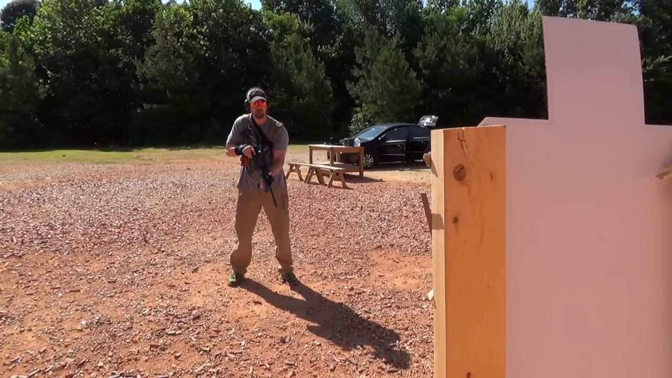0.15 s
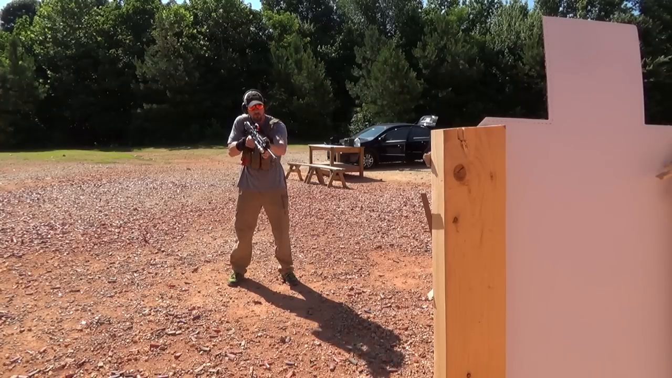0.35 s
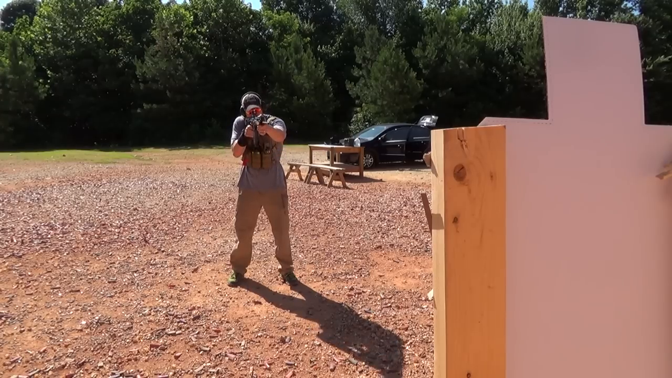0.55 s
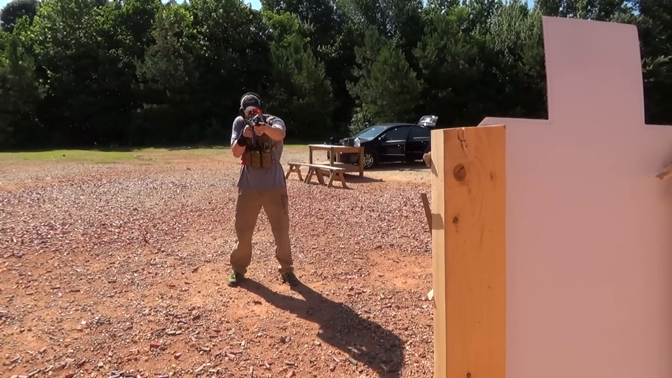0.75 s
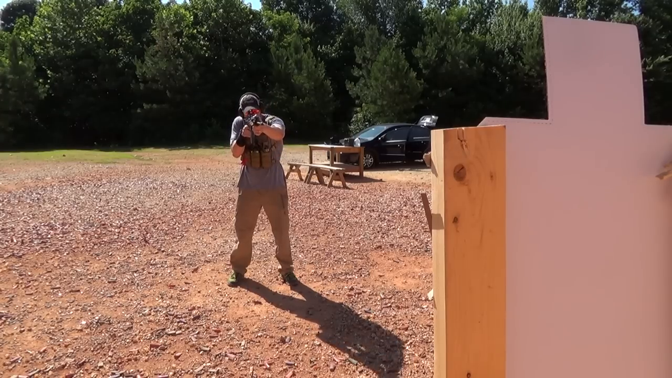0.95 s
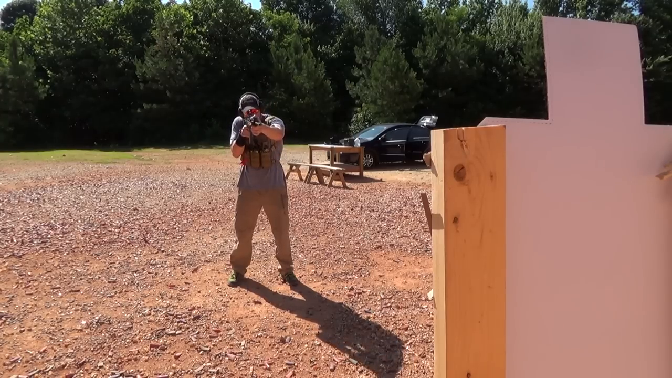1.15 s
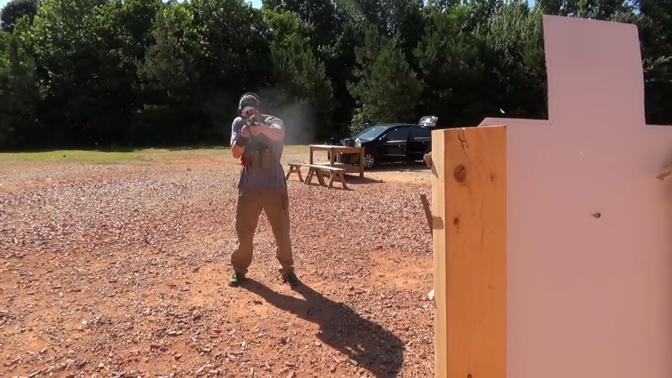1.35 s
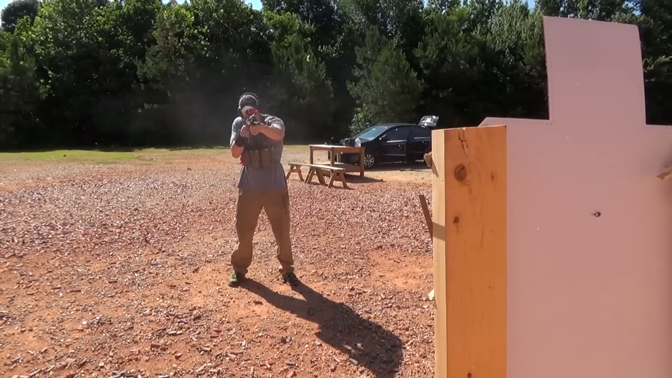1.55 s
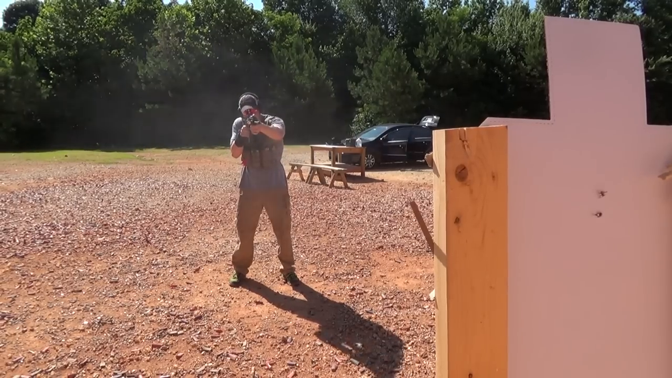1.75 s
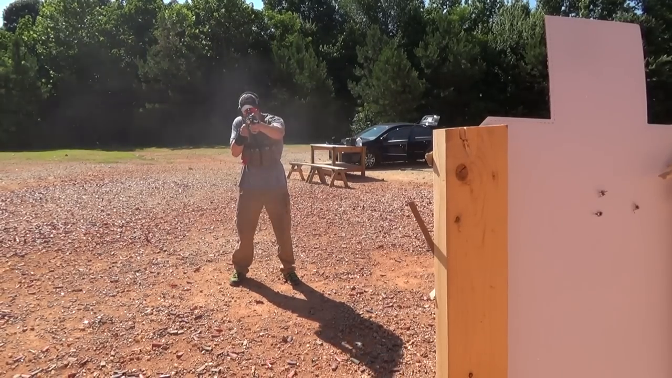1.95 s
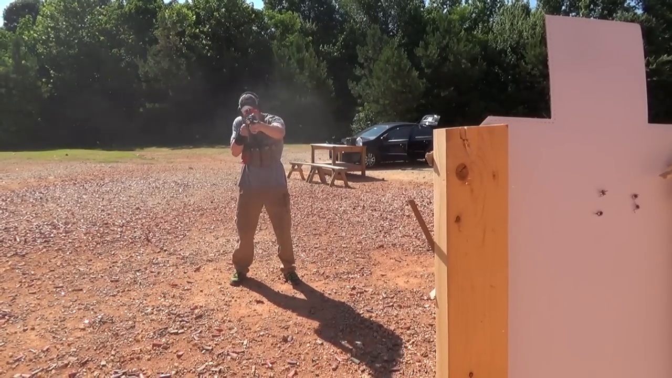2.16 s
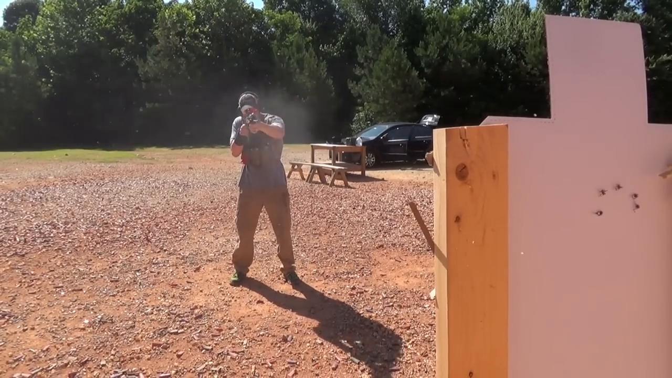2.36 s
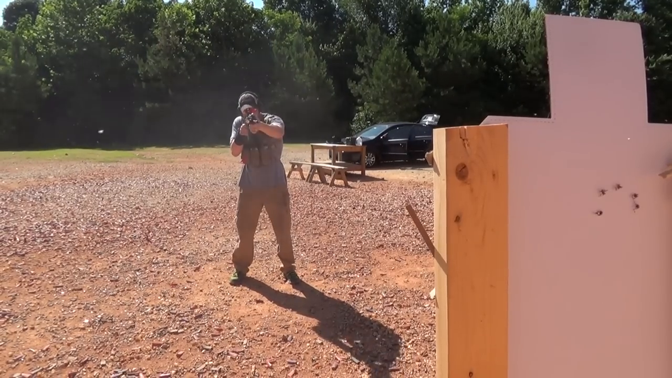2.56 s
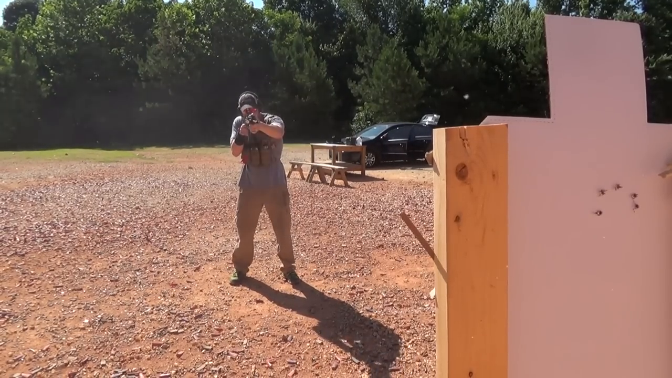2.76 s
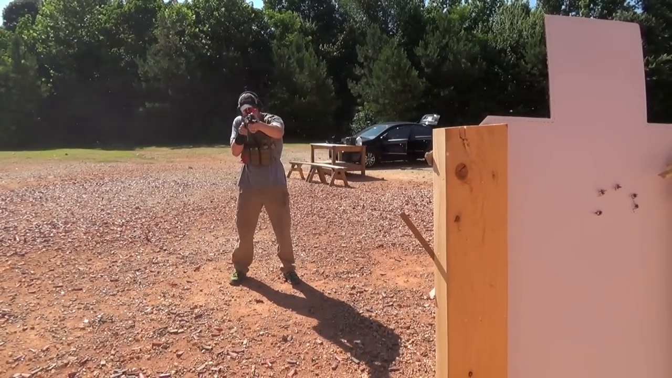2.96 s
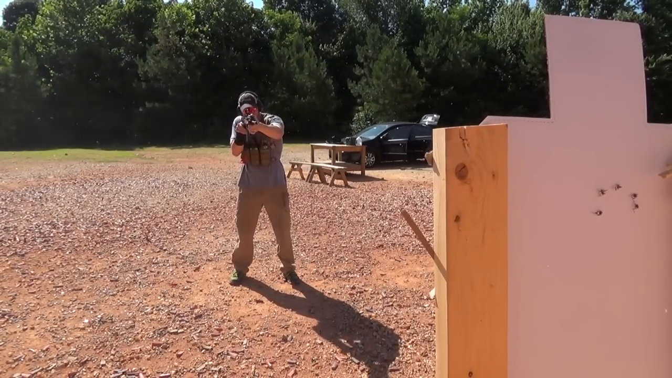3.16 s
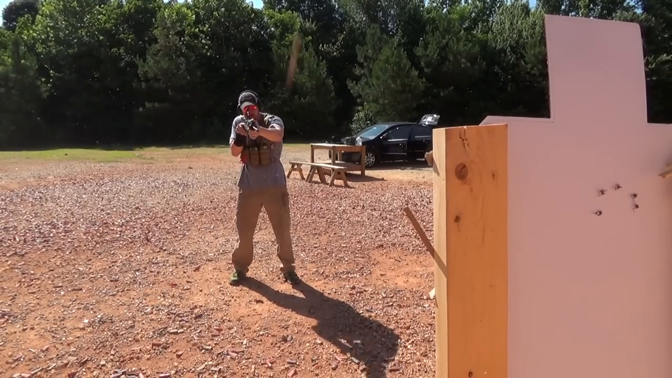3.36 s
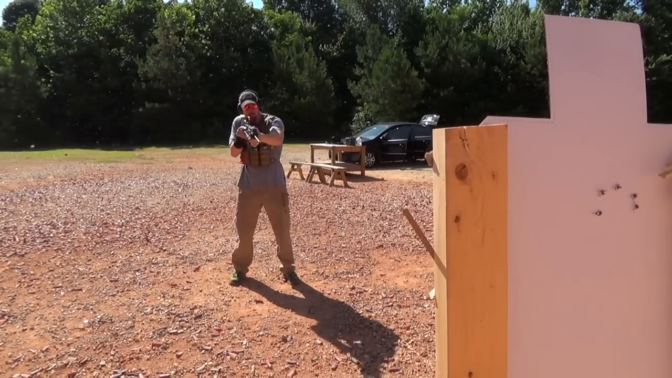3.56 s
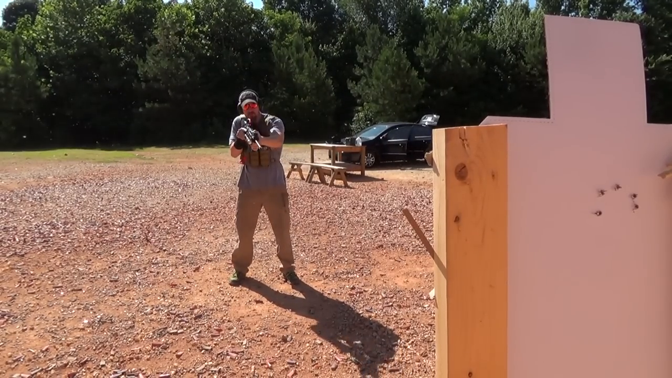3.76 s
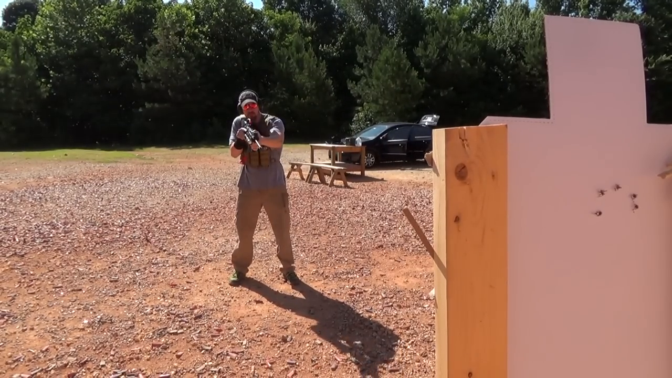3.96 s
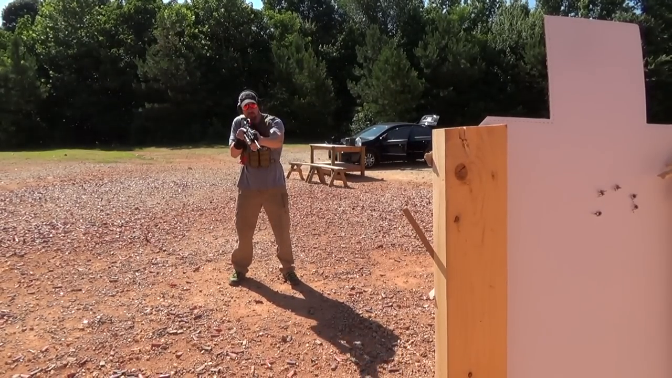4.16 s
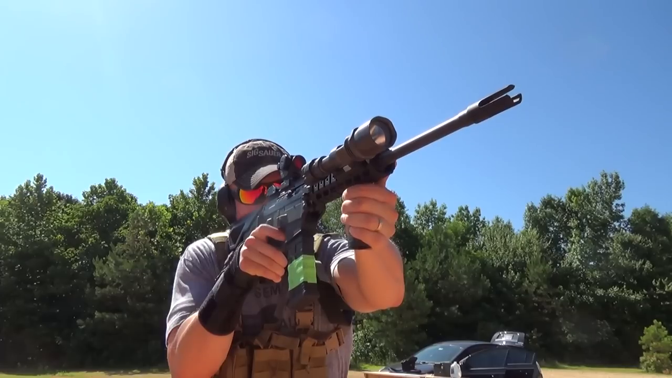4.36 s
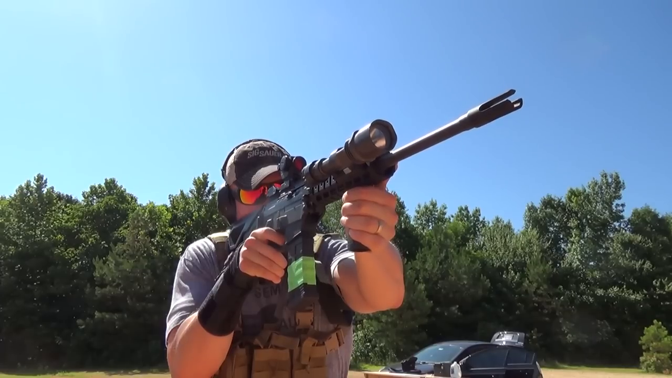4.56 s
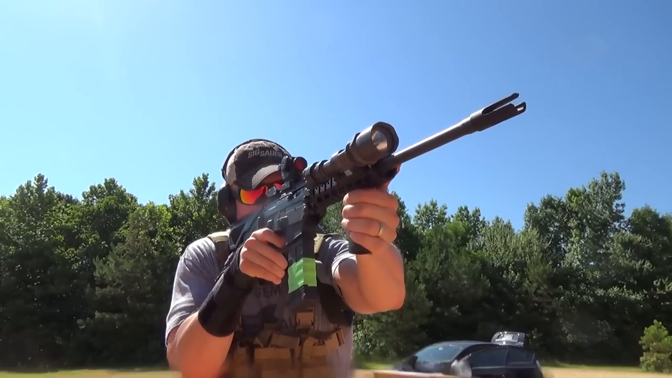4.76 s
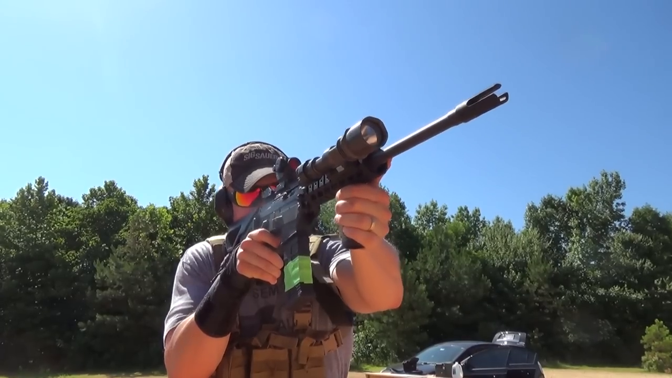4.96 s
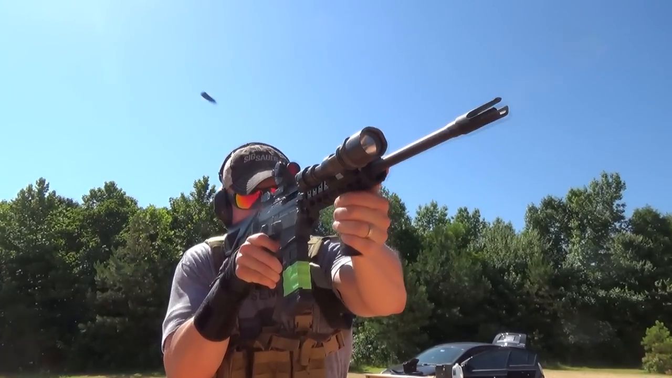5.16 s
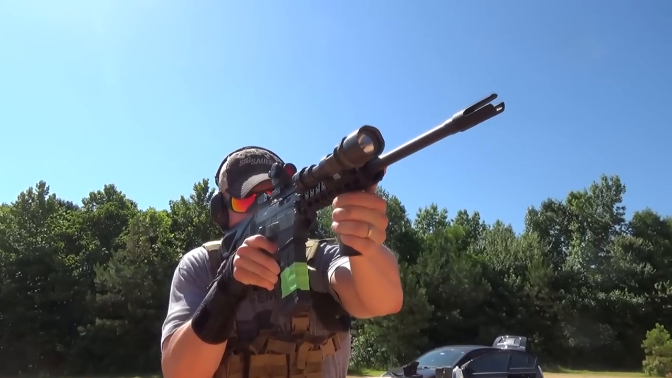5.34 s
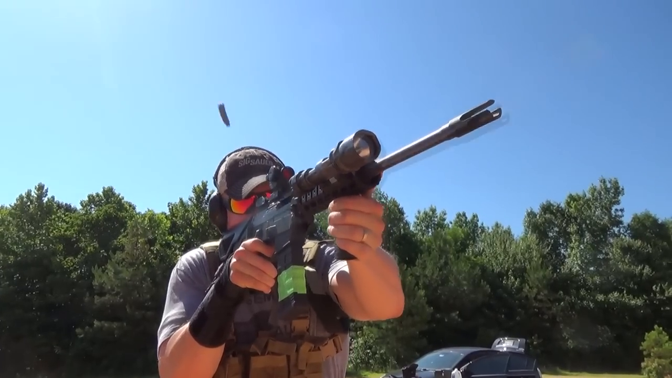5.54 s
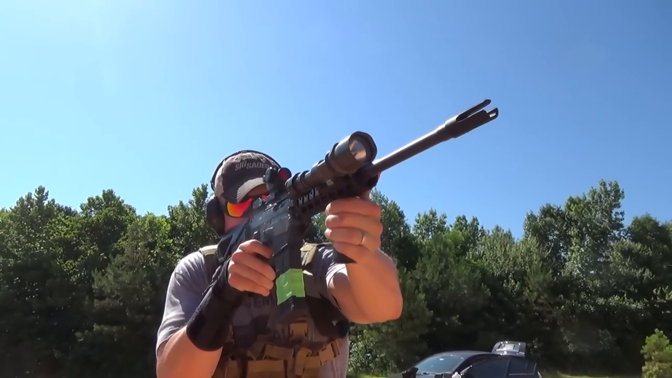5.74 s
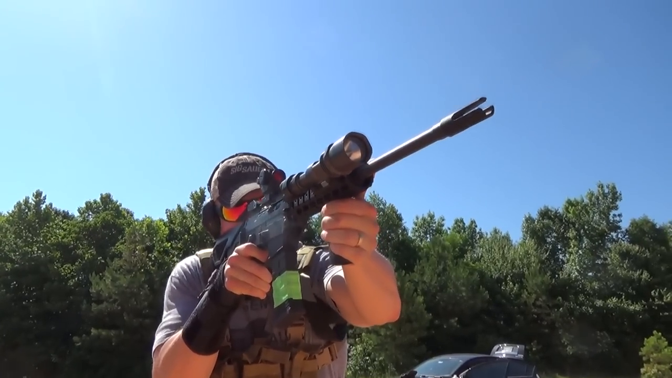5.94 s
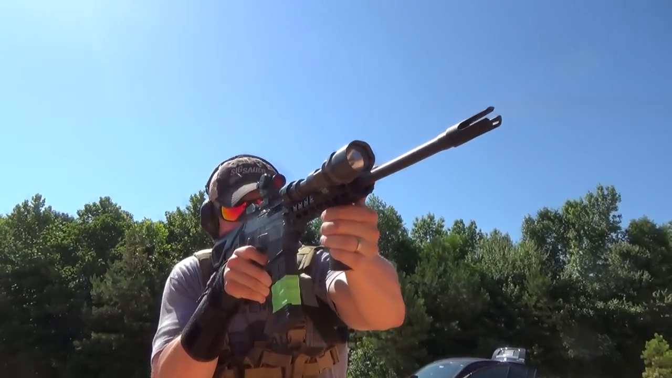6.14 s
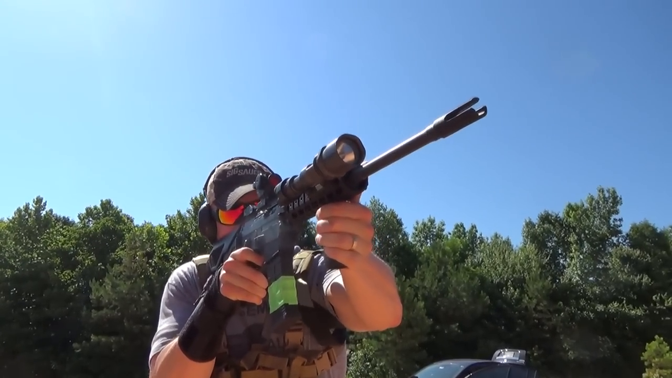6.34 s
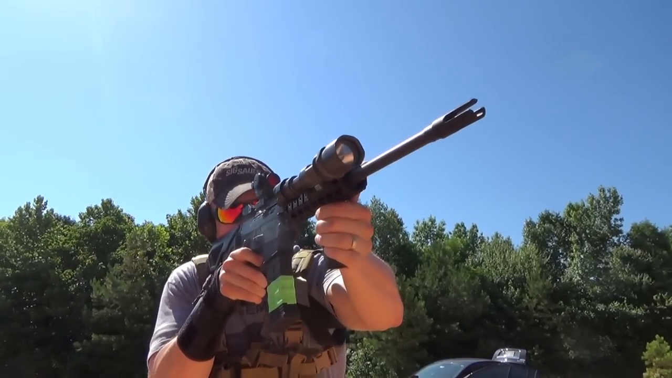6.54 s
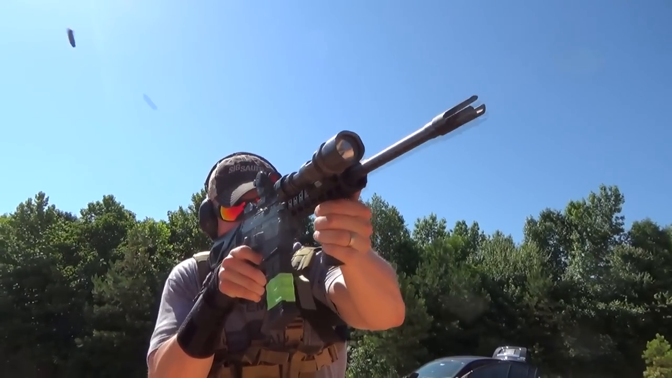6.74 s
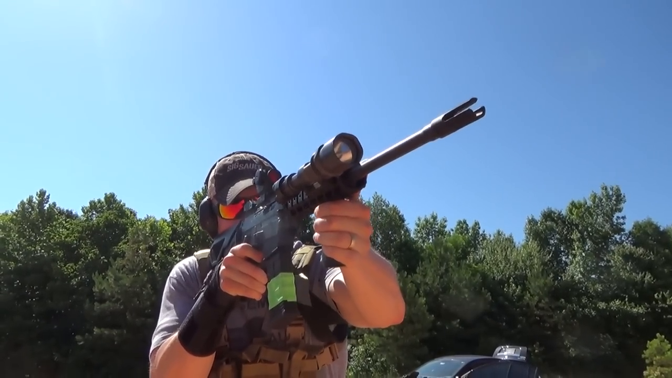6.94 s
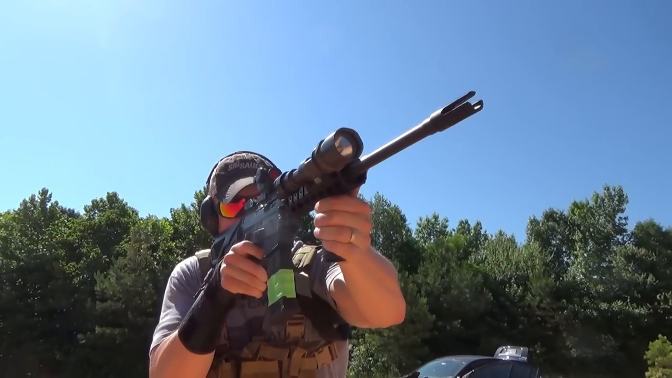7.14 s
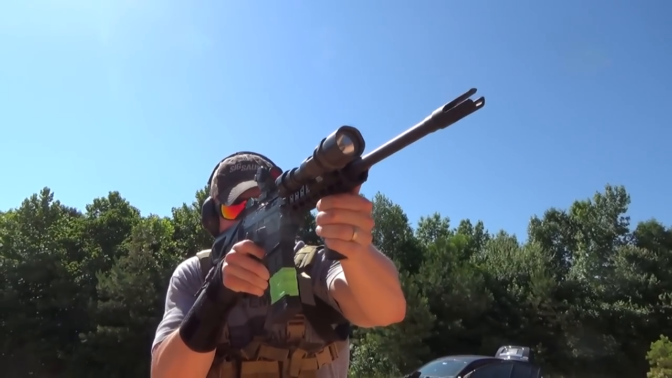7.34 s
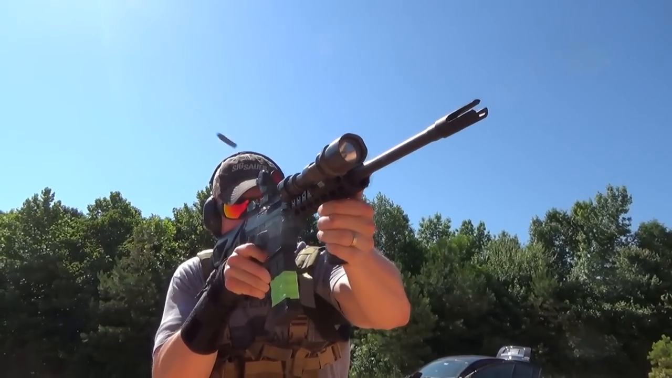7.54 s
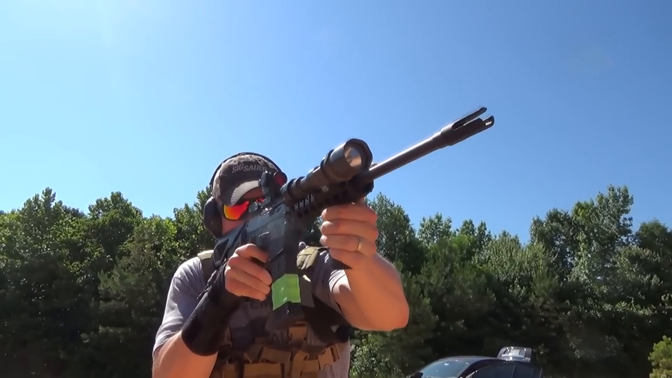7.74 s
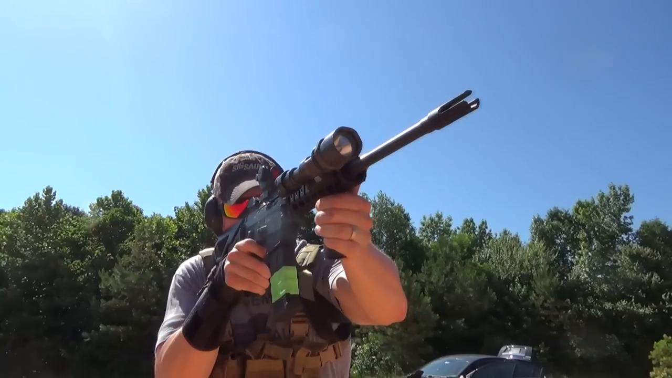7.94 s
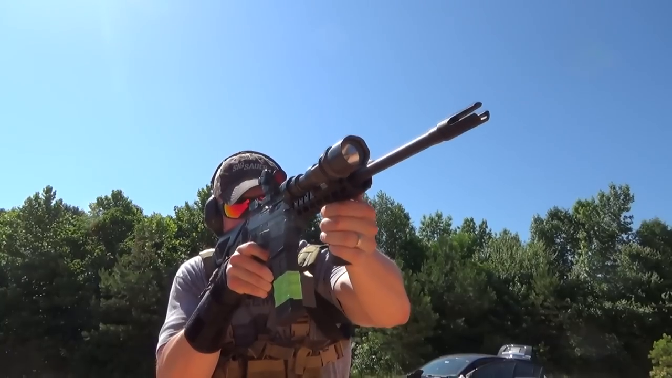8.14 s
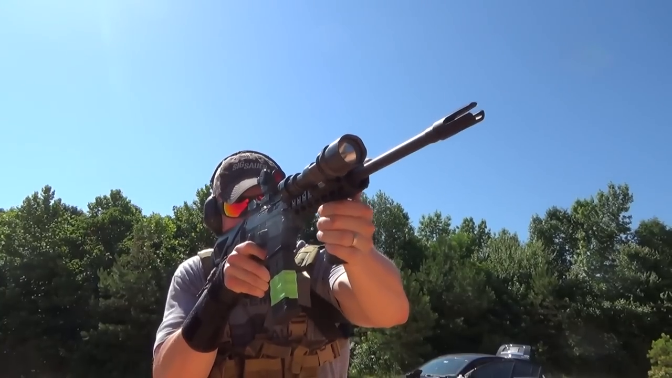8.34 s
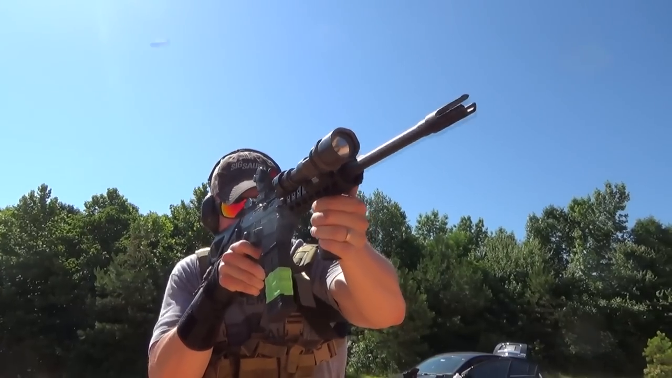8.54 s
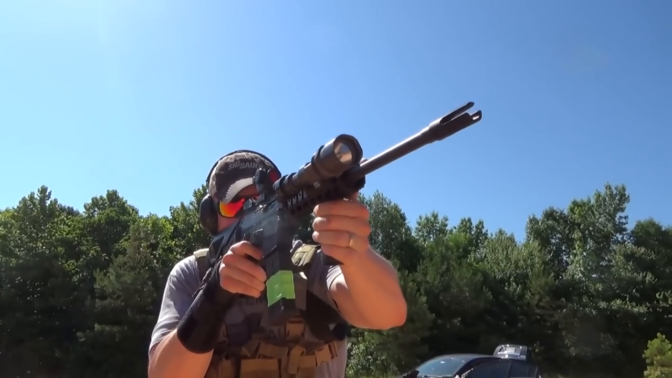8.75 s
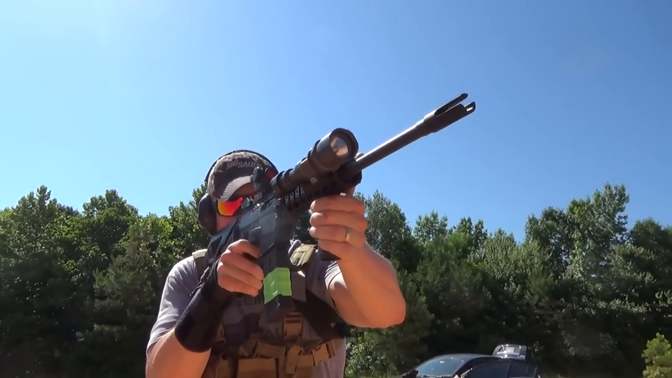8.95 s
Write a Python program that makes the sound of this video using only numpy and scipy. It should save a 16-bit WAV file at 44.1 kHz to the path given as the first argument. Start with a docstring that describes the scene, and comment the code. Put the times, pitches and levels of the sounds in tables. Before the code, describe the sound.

On an open gravel range edged by trees, quiet air, a faint insect and small rifle clicks precede five supersonic cracks and blasts heard beside the target. The forest roar fades as grit rains down and clods knock the wooden stand. The sound then jumps beside the shooter: wind buffets the microphone, birds whistle, and fourteen close, punchy shots follow in an even string, with bolt clacks and trigger clicks between.

```python
"""A rifle on an outdoor gravel range, heard from two places in turn; air, an insect and wind lie under both.
Beside the target come a few handling clicks and bird calls, then five shots: crack, blast, boom and forest echo.
Afterwards grit patters down as dense random hits, and clods ring the wooden target stand as decaying sines.
Beside the shooter, wind buffets and slurred whistles fill the pause; then come fourteen shots, each a pressure
pulse in shaped noise, with bolt clacks and bright trigger clicks between. A fast limiter flattens the shots."""
import sys
import numpy as np
from scipy import signal
from scipy.fft import rfft, irfft
from scipy.io import wavfile
from scipy.ndimage import uniform_filter1d

SR = 44100
rng = np.random.default_rng(int(sys.argv[2]) if len(sys.argv) > 2 else 0)


def to_wav(sig):
    """Store sig (one row per channel, or 1-D mono) as 16-bit WAV at the path in sys.argv[1].

    Samples outside -1..1 are clipped; the rate is SR.
    """
    pcm = np.clip(np.atleast_2d(sig), -1, 1) * 32767
    pcm = np.round(pcm).astype(np.int16)
    wavfile.write(sys.argv[1], SR, pcm.T)  # frames by channels


N = 396900
TIME = np.arange(N) / SR
CUT_S = 4.272  # the listening place moves from the target to the shooter

# shots heard beside the target: blast_s, relative level_db, crack_lead_s (the bullet's crack comes first)
FAR_SHOTS = [(1.444, 2, .004), (1.6843, -1, .0046), (1.9368, -1.5, .005), (2.1807, -4, .005),
             (2.4272, -3, .004)]
# shots heard beside the shooter: start_s
NEAR_TIMES = [4.8702, 5.2310, 5.6137, 5.955, 6.231, 6.5013, 6.7974, 7.0785, 7.3542, 7.6268, 7.9324, 8.2735,
              8.586, 8.8817]
# colour of the bolt's clack: pitch_hz, relative level_db (per Hz)
BOLT_COLOUR = [(500, -30), (2000, -12.5), (4500, 7), (7500, 0), (11500, 3.5), (16000, -15)]
# the bolt's clacks after each shot: delay_s, attack_s, relative level_db, hold_s, t60_s
BOLT_SHAPE = [(.055, .001, -17, 0.0018, 0.016), (0.0626, 0.00035, -15, 0.00031, 0.0068),
              (.063, .001, -35, 0, .11)]


def amp(db):
    """Decibels to gain."""
    return 10 ** (np.asarray(db) / 20)


def evened(x):
    """Scaled to rms 1."""
    return x / np.sqrt(np.mean(x ** 2) + 1e-20)


def read(points, hz):
    """A spectrum's value, interpolated on a log-frequency axis."""
    f, value = np.transpose(points)
    return np.interp(np.log(hz + 1), np.log(f + 1), value)


def add(mix, s, sound):
    """Mixes a sound in at time s, cut off at the end of the mix."""
    part = mix[:, max(round(s * SR), 0):][:, :sound.shape[-1]]
    part += sound[..., :part.shape[1]]


def phases(size):
    """Flat spectra of random phase, for middle and side."""
    return np.exp(2j * np.pi * rng.random((2, size // 2 + 1)))


def coloured(colour, z):
    """Left and right noise of joint rms 1: spectra z shaped by a colour, with a quieter side signal."""
    # stereo width of the noise: pitch_hz, side_minus_middle_db
    side_balance = [(40, -18), (120, -17), (300, -13.5), (1000, -12.5), (2500, -16), (4200, -34),
                    (5500, -9.5), (7500, -7), (10000, -12), (14000, -29)]
    hz = np.linspace(0, SR / 2, z.shape[1])
    mid, side = z * amp(read(colour, hz)) * np.minimum(hz / 25, 1)  # thinned below 25 Hz
    side = side * amp(read(side_balance, hz))
    return evened(irfft(np.array([mid + side, mid - side])))


def swell(arrivals, t):
    """Each arrival rises, holds and dies away by 60 dB per t60; their powers add."""
    power = 0
    for start, attack, db, hold, t60 in arrivals:
        rise = np.clip((t - start) / attack, 0, 1)
        fall_db = 60 * np.maximum(t - start - attack - hold, 0) / t60
        power = power + (rise * amp(db - fall_db)) ** 2
    return np.sqrt(power)


def waver(t, per_s, depth_db):
    """A gain that wanders at random between per_s fresh values a second."""
    knots = rng.standard_normal(1024)
    return amp(depth_db * np.interp(t * per_s, np.arange(1024), knots))


def scatter(shots, colour, shape, alike_hz, absorb_db=0, size=4096):
    """Fixed surroundings answer each shot alike in the bass; above alike_hz the moving air redraws the answer."""
    out, t = np.zeros((2, N)), np.arange(size) / SR
    hz = np.fft.rfftfreq(size, 1 / SR)
    alike = 1 / np.sqrt(1 + (hz / alike_hz) ** 2)
    changing = np.sqrt(1 - alike ** 2)
    place = phases(size)
    envelope = swell(shape, t)
    answers = [coloured(colour, alike * place + changing * phases(size)) for _ in shots]
    answers = np.array(answers, np.float32)
    if absorb_db:  # air takes absorb_db per kHz and second, so longer paths are duller
        f, age, z = signal.stft(answers, SR, nperseg=256)
        loss_db = absorb_db * f[:, None] / 1e3 * np.maximum(age - .3, -.08)
        answers = signal.istft(z * np.float32(amp(-loss_db)), SR, nperseg=256)[1][..., :size]
    for (s, db, *_), answer in zip(shots, answers):
        add(out, s, amp(db) * envelope * answer)
    return out


def placed(x, picture, low_hz=45):
    """Nearby surfaces favour one side or the other, band by band; the deepest bass is lost."""
    hz, rows = np.fft.rfftfreq(N, 1 / SR), np.array(picture)
    left, right = rfft(x) * hz ** 2 / (hz ** 2 + low_hz ** 2)
    mid = (left + right) / 2
    side = (left - right) / 2 * amp(read(rows[:, [0, 2]], hz))
    lean = np.tanh(np.log(amp(read(rows[:, :2], hz))) / 2)
    return irfft(np.array([mid + side + lean * mid, mid - side - lean * mid]), N)


def birds():
    """Each whistle swells and fades while it slides from one pitch to another, or holds one."""
    # slurred whistles: start_s, length_s, first_hz, last_hz, relative level_db, bend (over 1 glides late, under 1 early)
    whistles = [(.66, .21, 3480, 3330, -66, 1), (4.44, .04, 5500, 5500, -61, 1),
                (4.55, .045, 5400, 3500, -61, 1), (4.605, .075, 3500, 6750, -59, .45),
                (4.66, .13, 6750, 6620, -65, 1), (4.78, .047, 5800, 3700, -47, 2.7)]
    out = np.zeros((1, N))
    for s, length, first_hz, last_hz, db, bend in whistles:
        u = np.arange(0, length, 1 / SR) / length
        hz = first_hz + (last_hz - first_hz) * u ** bend
        add(out, s, amp(db) * np.sin(np.pi * u) * np.sin(2 * np.pi * np.cumsum(hz) / SR))
    return out[0]


def trill(insect_hz=2770, trill_hz=30.2):
    """An insect's steady trill: a pulsed tone, each wing stroke falling a little in pitch."""
    stroke = (TIME * trill_hz) % 1
    hz = insect_hz * (1 - 0.18 * (stroke - .5))
    return np.sin(np.pi * stroke) ** 6 * np.sin(2 * np.pi * np.cumsum(hz) / SR)


def outdoors(air_db=-43, hum_db=-53, hum_hz=138, insect_db=-55, farther_db=-7, bird_db=0):
    """Still air as noise, a distant hum that fades out, and an insect and birds blurred by the trees."""
    # colour of the still air: pitch_hz, relative level_db (per Hz)
    air_colour = [(150, -37.5), (250, -9.5), (761, -10.5), (831, -9.5), (1330, -15.5), (2760, -18.5),
                  (3010, -18), (13900, -27.5), (15200, -20), (16000, -2.5)]
    air = amp(air_db) * coloured(air_colour, phases(N))
    hum = amp(hum_db) * np.sin(2 * np.pi * hum_hz * TIME) * np.interp(TIME, [1.5, 2.5], [1, 0])
    insect = amp(insect_db + farther_db * (TIME < CUT_S)) * trill()  # fainter beside the target
    calls = amp(bird_db) * birds() + insect
    leaves = rng.standard_normal(4096) * np.exp(-TIME[:4096] / .025)  # a short diffuse tail
    calls = calls + .45 * signal.oaconvolve(calls, leaves / np.linalg.norm(leaves))[:N]
    flutter = waver(TIME, per_s=50, depth_db=2.2)
    return air + hum + flutter * calls


def eddies(colour, apart_hz=55):
    """Wind noise on two ports: below apart_hz each port feels its own pressure."""
    hz = np.fft.rfftfreq(N, 1 / SR)
    own = 1 / np.sqrt(1 + (hz / apart_hz) ** 2)
    z = own * phases(N) + np.sqrt(1 - own ** 2) * phases(N)[0]
    return evened(irfft(z * amp(read(colour, hz)) * np.minimum(hz / 25, 1)))


def breeze(light_waver_db=3.5, gust_waver_db=2.5):
    """Wind buffets the microphone: a light breeze at the target, stronger on the right; a dying gust at the shooter."""
    # single buffets: start_s, attack_s, relative level_db, hold_s, t60_s
    buffet_shape = [(.1, 0.042, -42, 0.012, 0.22), (.21, .02, -45, .04, 0.18), (.72, .02, -46, .02, .15),
                    (.96, .03, -46, .02, .1), (2.94, 0.039, -35, .02, 0.18), (3.09, .025, -39, .01, 0.09),
                    (4.272, .006, -30, .06, .3), (4.345, 0.041, -19.5, 0.019, 0.043),
                    (4.497, 0.013, -25.5, .035, 0.57), (4.66, 0.022, -23.5, .015, 0.27)]
    # colour of the wind at the target: pitch_hz, relative level_db (per Hz)
    light_colour = [(15, -41), (25, -13), (54, -2), (70, 2.5), (108, -3.5), (139, -2.5), (153, -7),
                    (162, -4.5), (400, -30), (520, -66), (880, -120)]
    # colour of the wind at the shooter: pitch_hz, relative level_db (per Hz)
    gust_colour = [(25, -25), (50, -9.5), (85, -4), (130, -3.5), (180, -2), (260, -7), (350, -17),
                   (500, -26), (800, -38), (1500, -57.5)]
    breeze_db, lull_db, lull_s = -52.5, -60, 3.2  # the light breeze drops once
    gust_db, gust_end_s, fall_db_per_s, after_gust_db = -33, 4.97, 15, -46.5  # the gust sinks to a breeze
    buffets = swell(buffet_shape, TIME)
    light = amp(np.where(TIME < lull_s, breeze_db, lull_db))
    light = light * waver(TIME, per_s=12, depth_db=light_waver_db)
    dying = amp(gust_db - fall_db_per_s * np.maximum(TIME - gust_end_s, 0))
    strong = np.hypot(dying, amp(after_gust_db)) * waver(TIME, per_s=20, depth_db=gust_waver_db)
    at_target = np.hypot(light, buffets) * eddies(light_colour) * amp([[-1.8], [1.5]])
    at_shooter = np.hypot(strong, buffets) * eddies(gust_colour)
    return np.where(TIME < CUT_S, at_target, at_shooter)


def ticks(events, colour, tick_db, decay, ring_db, ring_decay):
    """Small hard impacts: a noise snap with a faint ring after it, each with its own spectral tilt."""
    out, t = np.zeros((2, N)), np.arange(2048) / SR
    envelope = np.exp(-t / decay) + amp(ring_db) * np.exp(-t / ring_decay)
    hz, colour_db = np.transpose(colour)
    for s, db, tilt in events:
        tilted = np.c_[hz, colour_db + tilt * np.log2(hz)]
        add(out, s, amp(tick_db + db) * envelope * coloured(tilted, phases(2048)))
    return out


def handling():
    """The rifle's sling and controls click: short noise snaps."""
    # clicks: start_s, relative level_db, tilt_db_per_octave
    clicks = [(.1551, -35, -4.5), (.16, -21.5, 2), (.24, -48, -4), (.3144, -46.5, -2.5), (.71, -39, -7),
              (4.7772, -34, -4), (4.8234, -24, 2.5)]
    # colour of a click before its tilt: pitch_hz, relative level_db (per Hz)
    handling_colour = [(300, -25), (1800, 1), (2500, 1), (3800, -3), (6000, 0), (9000, -2.5), (12500, -1),
                       (16000, -21)]
    return ticks(clicks, handling_colour, tick_db=6, decay=.0012, ring_db=-15, ring_decay=.009)


def pebbles():
    """The larger bits of falling gravel tick as they land."""
    # landings: start_s, relative level_db, tilt_db_per_octave
    landings = [(3.203, -28.5, 15), (3.3315, -28.5, -5), (3.426, -35, 7), (3.5676, -35, 3),
                (3.6038, -33, 1), (3.6453, -29.5, 7), (3.6794, -36, -3), (3.713, -34, -4),
                (3.7234, -28.5, 0), (3.7514, -31.5, -2), (3.7816, -32, -3), (3.7976, -25.5, 14),
                (3.827, -32, 8), (3.8541, -41, 2), (3.9394, -35.5, -1), (4.0459, -33.5, 3),
                (4.1726, -31, -1), (4.24, -34, -0.5)]
    # colour of a landing before its tilt: pitch_hz, relative level_db (per Hz)
    pebble_colour = [(300, -16), (1800, -2.5), (5000, -3.5), (9000, -7), (12500, -2.5), (16000, -21)]
    return ticks(landings, pebble_colour, tick_db=7, decay=0.00093, ring_db=-15, ring_decay=.014)


def grit(per_s=150, grit_db=-50, spread_db=4):
    """Dirt thrown up by the bullets rains down: random hits of dull crumbs and sharp grains of sand."""
    shower = np.interp(TIME, [2.8, 3.2, 3.75, 4.2], [0.054, 1.1, 1.14, 1.55]) * (TIME < CUT_S)
    # colours: (pitch_hz, relative level_db per Hz)
    crumbs = [(200, -0.5), (900, -3), (1800, -6), (3500, -12), (8000, -13), (16000, -16)]
    sand = [(200, -22), (2500, 1), (6000, -4.5), (12000, 1), (16000, -7)]
    out = np.zeros((2, N))
    for colour, decay in [(crumbs, .003), (sand, .0015)]:
        strength = amp(spread_db * np.minimum(rng.exponential(1, N), 3.5))
        hits = (rng.random(N) < per_s / SR) * strength
        envelope = signal.lfilter([1], [1, -np.exp(-1 / (decay * SR))], hits)
        out += evened(envelope) * coloured(colour, phases(N))
    return amp(grit_db) * shower * out


def knocks(knock_db=0, crumble_db=-12):
    """Clods ring the modes of the wooden target stand and crumble in a burst of noise."""
    # clods striking wood: start_s, relative level_db, pitch_hz of the main mode
    clods = [(3.2259, -19, 1720), (3.355, -24, 1810), (3.364, -18.5, 1070), (3.8688, -22, 1930),
             (4, -17.5, 1480), (4.102, -26.5, 1255), (4.1565, -27, 1220), (4.1846, -26.5, 1750),
             (4.25, -35, 1390)]
    # modes of the wood: ratio to the main mode, relative level_db, t60_s
    modes = [(.8, -7, 0.013), (1, -1.5, 0.024), (1.6, -16, .02)]
    crumb_colour = [(300, -15), (1200, 4), (2500, -10), (6000, -18), (16000, -24)]  # (pitch_hz, level_db per Hz)
    out, t = np.zeros((2, N)), np.arange(3000) / SR
    onset = 1 - np.exp(-t / 0.00043)
    for s, db, hz in clods:
        ring = sum(amp(d - 60 * t / t60) * np.sin(2 * np.pi * hz * ratio * t) for ratio, d, t60 in modes)
        crumbs = coloured(crumb_colour, phases(3000)) * np.exp(-t / 0.011)
        add(out, s, amp(db + knock_db) * (ring + amp(crumble_db) * crumbs) * onset)
    return out


def metal_pings():
    """A few thin metallic pings: high sines that decay at once."""
    # pings: start_s, pitch_hz, relative level_db, t60_s
    pings = [(3.427, 13000, -40, 0.27), (4.047, 12700, -39, .08), (4.055, 11900, -40, 0.17),
             (4.12, 9100, -42, 0.12), (4.825, 9200, -24, 0.035)]
    out, t = np.zeros((2, N)), np.arange(8192) / SR
    for s, hz, db, t60 in pings:
        add(out, s, amp(db - 60 * t / t60) * np.sin(2 * np.pi * hz * t))
    return out


def trigger_clicks(click_db=7, decay=0.0015, ring_db=-22, ring_decay=0.013):
    """The trigger resets with a bright click between shots: a noise snap with a fainter, longer ring."""
    # clicks: start_s, relative level_db
    resets = [(5.112, -7), (5.4865, -14), (5.838, -22), (6.1241, -19.5), (6.397, -21), (6.668, -23.5),
              (6.935, -24.5), (7.2105, -26.5), (7.5007, -27), (7.794, -25.5), (8.119, -26), (8.44, -30.5),
              (8.751, -31.5)]
    # colour of a click: pitch_hz, relative level_db (per Hz)
    click_colour = [(600, -21), (2000, -9), (4000, 4), (6500, 0), (8700, 1), (12000, 4.5), (16000, -12)]
    out, t = np.zeros((2, N)), np.arange(8192) / SR
    envelope = np.exp(-t / decay) + amp(ring_db) * np.exp(-t / ring_decay)
    for s, db in resets:
        add(out, s, amp(db + click_db) * envelope * coloured(click_colour, phases(8192)))
    return out


def forest():
    """Trunks and leaves return each shot as a swelling, darkening roar: one for each listening place."""
    # colours of the echo at the target and at the shooter: pitch_hz, relative level_db (per Hz)
    far_colour = [(24, -74), (40, -42), (75, -19), (256, -1.5), (329, 0.5), (491, 1.5), (942, -0.5),
                  (1020, -3.5), (1590, -5), (3560, -9), (10700, -17), (14500, -30), (16000, -57)]
    near_colour = [(24, -51), (40, -15), (147, -3.5), (249, 0), (491, 6), (896, 2), (965, -1.5),
                   (1810, 2.5), (2700, -4.5), (2910, -3), (4930, -4.5), (7730, -12), (9940, -12.5),
                   (13100, -22.5), (16000, -55)]
    # arrivals of the echo at the target and at the shooter: delay_s, attack_s, relative level_db, hold_s, t60_s
    far_shape = [(0.17, 0.072, 1, 0.1, 1.8), (.08, 0.42, -20.5, 0, 8.8)]
    near_shape = [(0.156, 0.1, 2.6, 0.092, 1), (.43, 0.12, -7.5, 0.027, 0.84)]
    far_db, near_db = -21.5, -15
    sink_db, halfway_s, sink_s = 18.5, 6.415, 0.68  # in the long string the echo holds, then sinks
    far_shots = [(s, far_db) for s, _, _ in FAR_SHOTS]
    near_shots = [(s, near_db) for s in NEAR_TIMES]
    far = scatter(far_shots, far_colour, far_shape, alike_hz=880, absorb_db=4.0, size=81920)
    near = scatter(near_shots, near_colour, near_shape, alike_hz=2020, absorb_db=8.0, size=40960)
    lumps = waver(TIME, per_s=70, depth_db=1)
    sunk_db = sink_db / (1 + np.exp((halfway_s - TIME) / sink_s))
    return far * (TIME < CUT_S) * lumps, near * amp(-sunk_db) * lumps


def far_rifle():
    """The supersonic bullet cracks just ahead of the blast; then the boom and the closing bolt."""
    # colours of blast (also the crack) and boom: pitch_hz, relative level_db (per Hz)
    blast_colour = [(35, -45), (60, -20), (354, -21), (621, -6.5), (991, -3), (1170, -5.5), (1700, -6),
                    (3340, -9.5), (11000, -12), (13900, -16.5), (16000, -30)]
    boom_colour = [(24, -67), (40, -33), (81, -18), (124, -2.5), (329, -1.5), (363, -1.5), (422, 0),
                   (630, 2), (697, -0.5), (1410, -12), (1590, -10.5), (6020, -20), (7540, -24),
                   (11300, -19), (16000, -32)]
    # arrivals of crack, blast and boom: delay_s, attack_s, relative level_db, hold_s, t60_s
    crack_shape = [(0, .0001, -8, .0012, .006)]
    blast_shape = [(0, 0.0006, 1, 0.0098, 0.052)]
    boom_shape = [(.002, 0.017, -6, 0.018, 0.25), (.1, 0.026, -20.5, 0.0042, 0.55)]
    cracks = [(s - lead, db) for s, db, lead in FAR_SHOTS]
    bolts = [(s + 0.015, db + 2) for s, db, _ in FAR_SHOTS]
    crack = scatter(cracks, blast_colour, crack_shape, alike_hz=3000, size=512)
    blast = scatter(FAR_SHOTS, blast_colour, blast_shape, alike_hz=1200, size=4096)
    boom = scatter(FAR_SHOTS, boom_colour, boom_shape, alike_hz=890, size=24576)
    bolt = scatter(bolts, BOLT_COLOUR, BOLT_SHAPE, alike_hz=1500, size=4096)
    return crack + blast + boom + bolt


def reflection(hz=600, decay=0.0012):
    """One pressure pulse, rounded into a short knock by the surface that returns it."""
    t = np.arange(1024) / SR
    return np.sin(2 * np.pi * hz * t) * np.exp(-t / decay) * (1 - np.exp(-t / 0.00086)) * 2


def near_rifle(pulse_db=-6, pulse_s=0.00069):
    """A steep pressure pulse and its bright spray, a hollow slap 30 ms later, the bolt, and the boom."""
    # resonances of the slap that comes back from nearby: pitch_hz, width_hz, relative level_db
    slap_modes = [(212, 30, -13), (500, 31, -3), (752, 57, -4), (890, 88, -7), (1170, 73, -12),
                  (1730, 560, -16.5)]
    # colours of blast and boom: pitch_hz, relative level_db (per Hz)
    blast_colour = [(35, -52), (60, -19), (437, -6.5), (579, -5.5), (1040, -6.5), (1140, -6.5),
                    (1380, -1.5), (1700, -8), (2580, -7.5), (3340, -10.5), (5210, -7.5), (7750, -9.5),
                    (12100, -9.5), (14600, -12.5), (16000, -51)]
    boom_colour = [(24, -58), (40, -24), (81, -18.5), (147, -8), (220, -3), (276, -6.5), (503, -4),
                   (615, -8), (873, -7.5), (990, -12.5), (1410, -24.5), (1550, -16.5), (7540, -29.5),
                   (11000, -27.5), (14500, -39), (16000, -48)]
    # arrivals of slap, blast and boom: delay_s, attack_s, relative level_db, hold_s, t60_s
    slap_shape = [(0.029, 0.002, -14, 0.013, 0.16)]
    blast_shape = [(0, 0.00019, -9.5, .021, 0.068), (.004, 0.0093, -4.5, 0, 0.038),
                   (0.033, .015, -20.5, 0, .16)]
    boom_shape = [(0.023, 0.014, -18, 0.00037, .2), (0.066, 0.036, -27, 0.0067, 0.44)]
    # single reflections off the car, tables and berm: delay_s, relative level_db
    bounces = [(0.032, -19.5), (0.0337, -4), (.037, -21), (.042, 0.5), (.068, -9), (0.088, -28),
               (.098, -11)]
    settled_db, opening_db, settle_s = 0.5, 17, 1.7  # the string starts loud and settles
    shots = [(s, settled_db + opening_db * np.exp((NEAR_TIMES[0] - s) / settle_s)) for s in NEAR_TIMES]
    hz = np.geomspace(40, 16000, 300)
    hollow = sum(amp(db) ** 2 / (1 + ((hz - f) / width) ** 2) ** 2 for f, width, db in slap_modes)
    slap_colour = np.c_[hz, 10 * np.log10(hollow)]
    out = scatter(shots, slap_colour, slap_shape, alike_hz=1800, size=8192)
    out += scatter(shots, blast_colour, blast_shape, alike_hz=4860, size=8192)
    out += scatter(shots, boom_colour, boom_shape, alike_hz=1200, size=24576)
    out += scatter(shots, BOLT_COLOUR, BOLT_SHAPE, alike_hz=1492, size=4096)
    u = np.arange(256) / SR / pulse_s
    pulse = (1 - u) * np.exp(-u)  # sudden pressure, then suction
    for s, db in shots:
        add(out, s, amp(db + pulse_db) * pulse)
        for delay, echo_db in bounces:
            add(out, s + delay, amp(db + echo_db) * reflection())
    return out


def scene():
    """Both listening places, with the small clicks, wind and outdoor air."""
    # stereo picture at the target and at the shooter: pitch_hz, left_minus_right_db, extra_width_db
    far_picture = [(130, -6, 7), (330, 0.5, -7), (760, 3.5, -7), (1900, 1, -5), (4000, 1, 4),
                   (7000, 0, 0.5), (13000, 0.5, -5)]
    near_picture = [(130, -9, -10), (330, -3.5, -7), (750, -0.6, -4.5), (1910, 0, -15), (4000, -0.5, -2),
                    (7000, 0.5, -1), (13000, 0, -2.5)]
    far_echo, near_echo = forest()
    at_target = placed(far_rifle() + far_echo + knocks() + grit(), far_picture)
    at_shooter = placed(near_rifle() + near_echo + trigger_clicks() + metal_pings(), near_picture)
    return at_target + at_shooter + handling() + pebbles() + breeze() + outdoors()


def record(dry, limit_db=-14.5, recover_db=350, ratio=14, edge_hz=15900):
    """A fast limiter, recovering at recover_db per second, ducks everything under each blast; peaks round off."""
    power_db = 10 * np.log10(abs(uniform_filter1d((dry ** 2).mean(0), size=180)) + 1e-12)
    fall = TIME * recover_db
    held_peak_db = np.maximum.accumulate(power_db + fall) - fall
    over_db = np.maximum(held_peak_db - limit_db, 0)
    held = dry * amp(-uniform_filter1d(over_db, size=40) * (1 - 1 / ratio))
    rounded = held / (1 + (held / .74) ** 4) ** (1 / 4)
    band_limit = signal.firwin(511, edge_hz, window=("kaiser", 9), fs=SR)  # treble ends at edge_hz
    return signal.oaconvolve(rounded, band_limit[None], "same")


dry = scene()
out = record(dry)
to_wav(out)
```